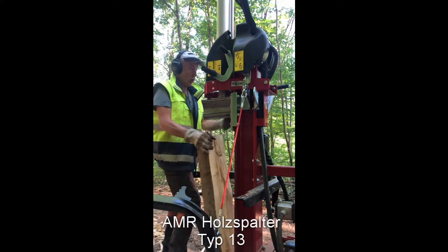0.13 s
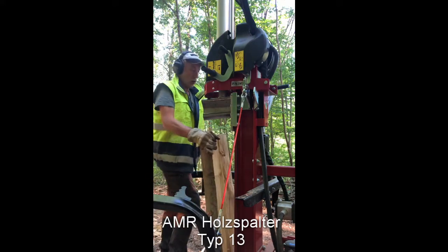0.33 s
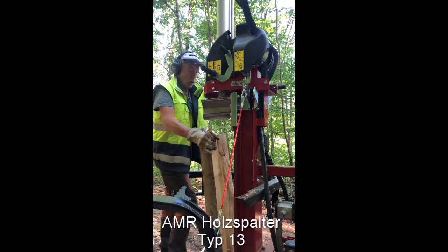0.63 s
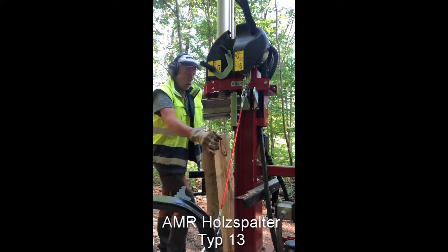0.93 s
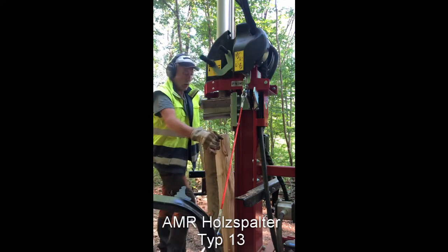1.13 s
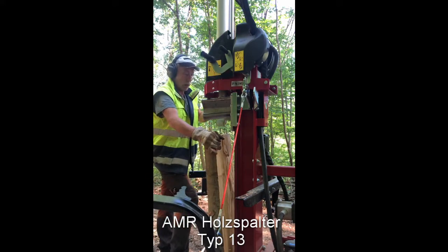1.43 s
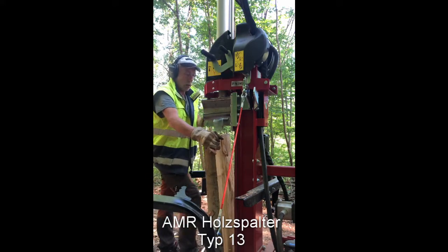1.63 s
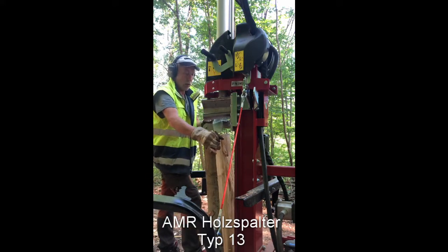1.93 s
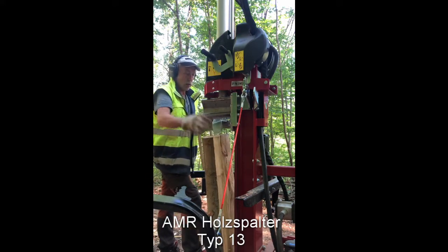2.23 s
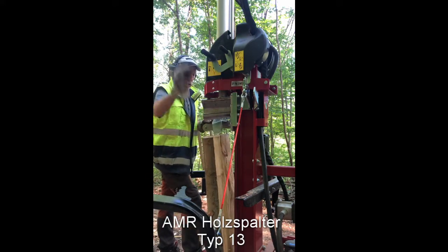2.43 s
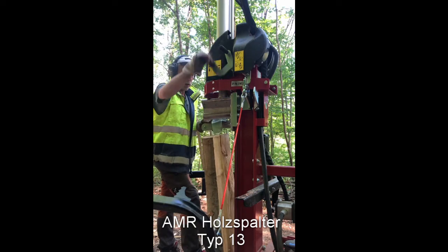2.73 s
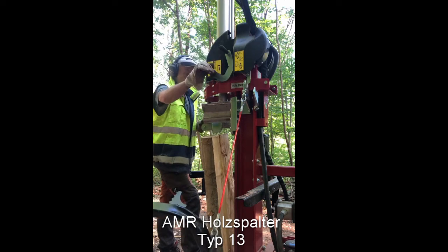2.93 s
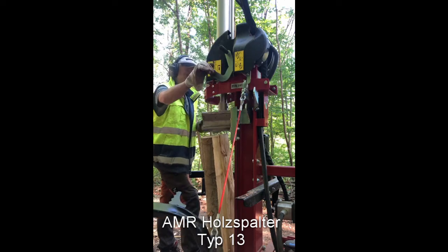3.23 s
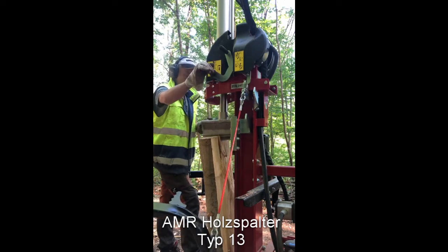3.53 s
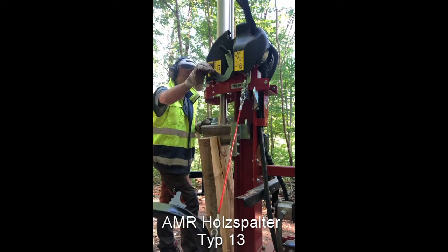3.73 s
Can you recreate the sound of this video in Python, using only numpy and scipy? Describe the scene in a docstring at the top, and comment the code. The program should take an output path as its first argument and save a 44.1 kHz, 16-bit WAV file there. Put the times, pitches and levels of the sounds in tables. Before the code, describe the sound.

A tractor diesel idles, driving a hydraulic log splitter that whines, squeals, then cracks wood apart.

```python
"""In a forest, close and dry: a three-cylinder tractor diesel idles and drives a hydraulic log splitter.
The engine sums tones locked to its cycle, gear whine, exhaust rumble and clatter noise swelling at each firing.
The lever clicks as damped noise, the loaded pump whines and groans, and sagging sines make the ram squeal.
Then the wedge tears the log open: pitched noise bursts crack over a grain of small tears, and the sound dips.
One microphone hears it all, on the left channel only; the right is silent."""
import sys
import numpy as np
from scipy import signal
from scipy.fft import rfft, irfft
from scipy.io import wavfile

SR = 44100
rng = np.random.default_rng(int(sys.argv[2]) if len(sys.argv) > 2 else 0)


def master_out(mix):
    """Clip the mix to full scale and print it as 16-bit PCM to the path in sys.argv[1]."""
    frames = np.transpose(np.atleast_2d(mix))
    ceiling = np.clip(frames, -1, 1)
    pcm = np.round(ceiling * 32767).astype(np.int16)
    wavfile.write(sys.argv[1], SR, pcm)


N = 170667

# Engine speed, sagging under load. Each row: time in seconds, four-stroke cycles per second.
ENGINE_SPEED = [(0, 11.508), (2.8, 11.508), (2.95, 11.42), (3.15, 11.19), (3.4, 11.0), (3.65, 10.66),
                (3.87, 10.4)]
START_CYCLES = 0.95  # share of the cycle already run at the start

# Exhaust and block tones. Each row: multiple of the cycle rate, level in dB relative to TONES_DB.
ENGINE_TONES = [(1, -47), (2, -48), (3, -18), (4, -38), (5, -28), (6, 0), (7, -25), (8, -26), (9, -7),
                (10, -23), (11, -23), (12, -9), (13, -11), (14, -19), (15, -13), (16, -18), (17, -26),
                (18, -15), (19, -26), (20, -17), (21, -19), (22, -12), (23, -14), (24, -13), (25, -17),
                (26, -23), (27, -28), (28, -26), (29, -17), (30, -13), (31, -19), (32, -28), (33, -21),
                (34, -21), (35, -17), (36, -26), (37, -24), (38, -27), (39, -20), (40, -27), (41, -20),
                (42, -20), (43, -16), (44, -15), (45, -20), (46, -28), (47, -19), (48, -17), (49, -23),
                (50, -20)]
TONES_DB = -23
# Every third multiple is a firing tone: radians at the start, radians lost per multiple.
FIRING_LEAD, FIRING_LAG = 0.6, 0.156
# One cylinder fires harder: place in the cycle, radians; other multiples below STRONG_TOP are tied to it.
STRONG_AT, STRONG_LEAD, STRONG_TOP = 0.586, -1.54, 27

# Uneven exhaust flow. Each row: frequency in Hz, relative density in dB per Hz.
EXHAUST_SPECTRUM = [(18, -36), (30, -18), (75, -9), (205, -6), (264, -2.5), (647, -7.5), (700, -52),
                    (910, -47), (1540, -120)]
EXHAUST_DB = -30

# Meshing gears. Each row: multiple of the cycle rate, rms level in dB before the gear gain.
GEAR_TONES = [(59, -43), (62, -45), (65, -44), (80, -43), (83, -41), (86, -43), (101, -44), (105, -45),
              (108, -44), (111, -30), (118, -40), (125, -41), (138, -44), (283, -50), (417, -55)]
GEAR_GAIN_DB, GEAR_WOBBLE_DB, GEAR_LOAD_LOSS_DB = 1.6, 0.8, 7  # the loss is at full load
# Faint whines of alternator and injection pump, moving with the engine.
# Each row: frequency at idle in Hz, nearly (taken to a whole multiple), rms level in dB before both gains.
IDLE_WHINES = [(1911, -53), (2175, -56), (2412, -53), (3085, -57), (3235, -56), (3451, -60), (4005, -62),
               (4253, -60), (4420, -57), (4818, -57), (5927, -62), (6837, -64), (8856, -67), (12640, -69)]
WHINE_GAIN_DB = 2

# Valve train and injectors. Each row: frequency in Hz, relative density in dB per Hz.
CLATTER_SPECTRUM = [(300, -31), (500, -7.5), (595, -4), (645, -15), (700, -4), (1200, -5), (1450, -3),
                    (1800, -9), (2100, -9), (2800, -15), (4000, -17), (6500, -20), (10000, -24.5),
                    (16000, -31)]
CLATTER_DB = -25.5  # before block resonances and swell
# Share alike in every cycle, fading above the cut in Hz; uneven taps within the cycle in dB.
REPEATING, REPEAT_CUT_HZ, TAP_SPREAD_DB = 0.72, 1300, 2
# Swell at each firing: height in dB, place of the first in cycles, sharpness as a power.
KNOCK_DB, KNOCK_AT, KNOCK_SHARP = 2.5, 0.28, 2
# Resonances of block and covers. Each row: frequency in Hz, width in Hz, gain in dB over the clatter.
BLOCK_RESONANCES = [(2420, 43, -7), (3250, 136, 0.5), (5140, 89, -10), (6500, 820, -13), (13100, 230, -3)]
# The machine as a whole grows quieter. Each row: time in seconds, gain in dB.
MACHINE_SINK = [(3.7, -0.5), (3.8, -2), (3.87, -2.5)]

# Oil pressure. Each row: time in seconds, pressure from 0 to 1.
OIL_PRESSURE = [(2.70, 0), (2.82, .5), (3.0, 0.66), (3.15, 0.57), (3.38, 0.95), (3.6, 0.73), (3.87, 0.63)]
# Pump teeth. Each row: multiple of the cycle rate, rms level in dB at full pressure before PUMP_GAIN_DB.
PUMP_TONES = [(24, -40), (128, -38), (170, -45)]
PUMP_GAIN_DB = -2
# The pump groans in spells. Each row: time in seconds, middle rms level in dB.
PUMP_GROAN = [(2.8, -62), (2.87, -35), (3.04, -34.5), (3.1, -51), (3.15, -48), (3.18, -28), (3.37, -26.5),
              (3.5, -49), (3.59, -28), (3.67, -34), (3.72, -32)]
GROAN_ORDER = 49  # multiple of the cycle rate
# Oil rushing through the valve. Each row: frequency in Hz, relative density in dB per Hz.
FLOW_SPECTRUM = [(120, -36), (200, 2), (231, -6), (503, -12.5), (540, -4), (683, -14.5), (1460, -7.5),
                 (1810, -16), (3940, -18), (15000, -34.5)]
FLOW_DB = -21  # middle rms at full pressure
HISS_HZ, HISS_WIDTH_HZ, HISS_DB = 6560, 3400, -31.5  # jet of oil at the valve edge, at full pressure
# The ram on its guide. Each row: start in seconds, length in seconds, starting pitch in Hz,
# rms level in dB before gain, flutter and fades.
RAM_SQUEALS = [(2.83, .25, 2840, -38), (2.83, .22, 3230, -39), (2.84, .22, 2400, -40),
               (2.95, .12, 5190, -41), (2.94, .54, 3950, -35), (3.27, .2, 3100, -40),
               (2.83, .12, 4850, -45), (3.04, .36, 4360, -42), (3.0, .36, 6660, -45), (3.0, .3, 7010, -48),
               (3.37, .08, 1910, -33), (2.93, .03, 14500, -50)]
SQUEAL_GAIN_DB, SQUEAL_FLUTTER_DB, SQUEAL_EDGE_S = 0.5, 3, 0.04
SQUEAL_SAG, SQUEAL_JITTER = 0.05, 0.005  # share of pitch lost per second, share of pitch it wanders

# Fibres snap. Each row: start in seconds, peak level in dB before CRACK_GAIN_DB, pitch in Hz.
FIBRE_CRACKS = [(3.412, -17, 3830), (3.4396, -3, 4500), (3.452, -17, 3000), (3.4614, -9, 8500),
                (3.4694, -6, 6560), (3.469, -12, 3300), (3.4803, -7, 4300), (3.4824, -9, 7000),
                (3.498, -11, 8500), (3.5004, -11, 5600), (3.512, -10, 8000), (3.524, -19, 5160),
                (3.5314, -6, 6960), (3.5414, -9, 4080), (3.545, -7.5, 8000), (3.5504, -4.5, 9100),
                (3.5565, -11, 4200), (3.5634, -9, 7870), (3.5797, -6, 5140), (3.6017, -13, 9500),
                (3.6228, -5, 7300), (3.6696, -6.5, 9240), (3.6955, -16, 6560), (3.7084, -13, 2930),
                (3.725, -6, 5960), (3.7489, -12, 2600), (3.7928, -15, 5270), (3.8077, -6.5, 4030),
                (3.8117, -15, 4500), (3.827, -23, 5040), (3.8487, -11, 2300), (3.849, -23, 6960),
                (3.8654, -13, 6950)]
CRACK_GAIN_DB, CRACK_T60_S, CRACK_Q = 2.5, 0.013, 4.0
BROAD_DB = -1  # wood-coloured noise beside the pitched part
# Dense tearing between the snaps. Each row: time in seconds, rms level in dB before flicker.
TEARING_LEVEL = [(3.39, -60), (3.41, -32), (3.435, -29), (3.46, -21), (3.52, -21), (3.56, -27), (3.6, -24),
                 (3.65, -29), (3.72, -25), (3.76, -29.5), (3.79, -27), (3.81, -24), (3.87, -24)]
TEARS_PER_S, TEAR_SPREAD_DB, TEAR_FLICKER_DB = 3000, 2.5, 3.5
# Colour of torn wood. Each row: frequency in Hz, relative density in dB per Hz.
WOOD_SPECTRUM = [(350, -13), (600, -6.5), (1230, -10.5), (1780, -29), (2210, -10), (2440, -17.5),
                 (3040, -10.5), (6640, -13.5), (16000, -17.5)]

# Short rubs and clicks of hand and lever. Each row: start in seconds, length in seconds before the decay,
# centre in Hz, rms level in dB before the envelope.
HAND_RUBS = [(1.679, 0.021, 7900, -29), (1.68, 0.031, 4200, -32), (2.73, 0.026, 5970, -35),
             (2.806, 0.0074, 3240, -23), (2.808, 0.01, 9500, -27.5)]
# Dull knocks of lever and wedge. Each row: start in seconds, peak level in dB, pitch in Hz.
DULL_THUDS = [(2.757, -11.5, 273), (2.785, -13, 267), (2.81, -12, 570), (2.943, -14, 470),
              (3.013, -11, 590), (3.375, -8.5, 595), (3.388, -16.5, 620), (3.399, -11, 475),
              (3.469, -10, 643), (3.502, -11, 620), (3.555, -8, 640), (3.6, -19, 910), (3.66, -19, 1050),
              (3.75, -16, 972), (3.807, -12, 1040)]
THUD_T60_S = 0.098
THUD_UPPER, THUD_UPPER_DB = 1.74, -5  # a second, broader ring: pitch ratio, relative level

# Bass, slightly lifted, drops out in three spells during the splitting.
# Each row: time in seconds, gain in dB.
BASS_GAIN = [(3.43, 1), (3.48, -1.5), (3.575, -6), (3.595, 1.5), (3.722, 1.5), (3.735, -14), (3.77, 0.5),
             (3.8, -7.5), (3.87, 1.5)]
BASS_HZ = 447
# The whole level dips briefly after some snaps.
# Each row: start in seconds, depth in dB before recovery eats into it, recovery spread in seconds.
LEVEL_DIPS = [(3.533, 8.5, 0.0055), (3.565, 7, .006), (3.674, 7, 0.0039), (3.7, 5, 0.0049),
              (3.731, 8.5, 0.0064), (3.794, 11, 0.0077), (3.83, 19, 0.0081), (3.854, 7, 0.0069)]
DIP_FALL_S = 0.0022
CUTOFF_HZ = 15760


def engine(turns, load):
    """Idling diesel: cycle-locked tones, rough exhaust flow, gear whine and clatter."""
    exhaust = amp(EXHAUST_DB) * coloured(rng.standard_normal(N), EXHAUST_SPECTRUM)
    return firing(turns) + exhaust + gears(turns, load) + clatter(turns)


def firing(turns):
    """Combustion repeats each cycle; phases align the firing tones and mark one stronger cylinder."""
    k = np.round(np.transpose(ENGINE_TONES)[0])
    free = rng.uniform(0, 2 * np.pi, len(k))
    phases = np.where(k < STRONG_TOP, STRONG_LEAD - 2 * np.pi * STRONG_AT * k, free)
    phases = np.where(k % 3 == 0, FIRING_LEAD - FIRING_LAG * k, phases)
    return amp(TONES_DB) * tones(ENGINE_TONES, phases, turns)


def clatter(turns):
    """Valve and injector noise partly repeats each cycle, swells at each firing and rings the block."""
    taps = amp(TAP_SPREAD_DB * np.repeat(rng.standard_normal(48), 80))
    pattern = rfft(rms_one(taps * rng.standard_normal(3840)))
    # Clear the multiples already sounding, then those left quiet beside the main whine.
    pattern[[m for m, _ in GEAR_TONES] + list(range(len(ENGINE_TONES) + 1))] = 0
    pattern[[109, 110, 113, 114, 115, 116, 117]] = 0
    same = looped(irfft(pattern), turns)
    fresh = rng.standard_normal(N) * np.sqrt(looped(rms_one(taps), turns))
    low = signal.butter(2, REPEAT_CUT_HZ, fs=SR, output="sos")
    mix = fresh + REPEATING * (signal.sosfilt(low, same) - signal.sosfilt(low, fresh))
    noise = coloured(mix, CLATTER_SPECTRUM)
    ringing = sum(amp(db) * resonate(noise, hz, width_hz) for hz, width_hz, db in BLOCK_RESONANCES)
    knock = (0.5 + 0.5 * np.cos(2 * np.pi * 3 * (turns - KNOCK_AT))) ** KNOCK_SHARP
    return amp(CLATTER_DB + KNOCK_DB * knock + 0.5 * drift(10)) * (noise + ringing)


def gears(turns, load):
    """Meshing teeth and auxiliaries whine on cycle multiples, quieter under load."""
    whines = [(hz / ENGINE_SPEED[0][1], db) for hz, db in IDLE_WHINES]
    out = tones(GEAR_TONES, rng.uniform(0, 2 * np.pi, len(GEAR_TONES)), turns)
    out += amp(WHINE_GAIN_DB) * tones(whines, np.arange(len(whines)) ** 2, turns)
    return out * amp(GEAR_GAIN_DB + GEAR_WOBBLE_DB * drift(14) - GEAR_LOAD_LOSS_DB * load)


def hydraulics(turns, load):
    """Pump whine and turbulent oil noise grow with pressure, beside the groan and the squealing ram."""
    whine = load * tones(PUMP_TONES, np.zeros(len(PUMP_TONES)), turns)
    whine *= amp(PUMP_GAIN_DB + 1.5 * drift(17))
    groan = amp(in_time(PUMP_GROAN) + 1.1 * drift(12)) * tones([(GROAN_ORDER, 0)], [0], turns)
    flow = load * amp(FLOW_DB + 3.2 * drift(9.9)) * coloured(rng.standard_normal(N), FLOW_SPECTRUM)
    jet = resonate_twice(rng.standard_normal(N), HISS_HZ, HISS_WIDTH_HZ)
    hiss = load * amp(HISS_DB + 1.1 * drift(14)) * rms_one(jet)
    return whine + groan + flow + hiss + ram_squeals()


def ram_squeals():
    """Metal rubbing on its guide sings in wavering, sagging sines."""
    out = np.zeros(N)
    for s, length, hz, db in RAM_SQUEALS:
        t = np.arange(int(length * SR)) / SR
        pitch = hz * (1 - SQUEAL_SAG * t + SQUEAL_JITTER * drift(61)[:len(t)])
        level = amp(db + SQUEAL_GAIN_DB + SQUEAL_FLUTTER_DB * drift(24)[:len(t)])
        fade = np.minimum(np.minimum(t, length - t) / SQUEAL_EDGE_S, 1)
        add(out, s, np.sqrt(2) * level * np.sin(2 * np.pi * np.cumsum(pitch) / SR) * fade)
    return out


def splitting():
    """Each fibre snap is a dying burst with its own pitch, over a dense grain of small tears."""
    sizes = amp(TEAR_SPREAD_DB * np.minimum(rng.exponential(1, N), 5))
    tears = sizes * rng.choice([-1, 1], N) * (rng.random(N) < TEARS_PER_S / SR)
    level = amp(in_time(TEARING_LEVEL) + TEAR_FLICKER_DB * drift(71))
    out = level * (in_time(OIL_PRESSURE) > 0) * coloured(tears, WOOD_SPECTRUM)
    t = np.arange(SR // 20) / SR
    envelope = amp(-60 * t / CRACK_T60_S) * np.minimum(t / 0.00071, 1)
    for s, db, hz in FIBRE_CRACKS:
        noise = rng.standard_normal(2 * len(t))
        burst = rms_one(resonate_twice(noise, hz, hz / CRACK_Q))
        burst += amp(BROAD_DB) * coloured(noise[::-1], WOOD_SPECTRUM)
        settled = burst[len(t):]  # skip the resonator's build-up
        add(out, s, amp(db + CRACK_GAIN_DB) * peak_one(envelope * settled))
    return out


def handling():
    """Rubs are short bursts of broad noise; thuds are damped noise in two resonances."""
    out, t = np.zeros(N), np.arange(SR // 5) / SR
    for s, length, hz, db in HAND_RUBS:
        burst = rms_one(resonate(rng.standard_normal(len(t)), hz, hz * 0.27))
        envelope = np.minimum(t / 0.0018, 1) * np.exp(-np.maximum(t - length, 0) / 0.0042)
        add(out, s, amp(db) * burst * envelope)
    envelope = amp(-60 * t / THUD_T60_S) * np.minimum(t / 0.0033, 1)
    for s, db, hz in DULL_THUDS:
        body = rms_one(resonate_twice(rng.standard_normal(len(t)), hz, hz * 0.45))
        upper = rms_one(resonate_twice(rng.standard_normal(len(t)), hz * THUD_UPPER, hz))
        add(out, s, amp(db) * peak_one(envelope * (body + amp(THUD_UPPER_DB) * upper)))
    return out


def tones(rows, phases, turns):
    """Sines on whole multiples of the cycle rate, from (multiple, rms dB) rows."""
    at = np.arange(8192) / 8192
    cycle = np.zeros(len(at))
    for (k, db), phase in zip(rows, phases):
        cycle += np.sqrt(2) * amp(db) * np.cos(2 * np.pi * round(k) * at + phase)
    return looped(cycle, turns)


def looped(cycle, turns):
    """Play one stored cycle at the engine's speed."""
    return np.interp(turns % 1 * len(cycle), np.arange(len(cycle) + 1), np.append(cycle, cycle[0]))


def coloured(x, points):
    """Shape x with a gain curve of (Hz, dB) points; rms 1."""
    hz, db = np.transpose(points)
    f = np.fft.rfftfreq(len(x), 1 / SR) + 1
    gain = amp(np.interp(np.log(f), np.log(hz), db, left=-90, right=-90))
    return rms_one(irfft(rfft(x) * gain, len(x)))


def resonate(x, hz, width_hz):
    """One resonance, gain about 1 on top."""
    r = np.exp(-np.pi * width_hz / SR)
    poles = [1, -2 * r * np.cos(2 * np.pi * hz / SR), r * r]
    return signal.lfilter([(1 - r * r) / 2, 0, (r * r - 1) / 2], poles, x)


def resonate_twice(x, hz, width_hz):
    """The same resonance twice in a row, for steeper skirts."""
    return resonate(resonate(x, hz, width_hz), hz, width_hz)


def drift(rate_hz):
    """Slow random wander, spread 1, made at a fortieth of the sample rate."""
    r = np.exp(-80 * np.pi * rate_hz / SR)
    noise = rng.standard_normal(N // 40 + 2002)
    slow = signal.lfilter([1], [1, -2 * r, r * r], noise)[2000:]  # skip the build-up
    return np.interp(np.arange(N) / 40, np.arange(len(slow)), rms_one(slow))


def in_time(rows):
    """A curve through (seconds, value) rows, sample by sample."""
    s, v = np.transpose(rows)
    return np.interp(np.arange(N) / SR, s, v)


def add(out, s, piece):
    """Mix a piece in at s seconds."""
    i = int(s * SR)
    out[i:i + len(piece)] += piece[:len(out) - i]


def amp(db):
    """Decibels to gain."""
    return 10 ** (np.asarray(db) / 20)


def rms_one(x):
    """Scale to rms 1."""
    return x / np.sqrt(np.mean(x ** 2) + 1e-20)


def peak_one(x):
    """Scale to peak 1."""
    return x / np.abs(x).max()


def scene():
    """Everything reaches one microphone, on the left channel."""
    turns = START_CYCLES + np.cumsum(in_time(ENGINE_SPEED)) / SR
    load = in_time(OIL_PRESSURE)
    machine = (engine(turns, load) + hydraulics(turns, load)) * amp(in_time(MACHINE_SINK))
    return (machine + splitting() + handling()) * [[1], [0]]


def record(dry):
    """Bass and level dip during the splitting, peaks are rounded, the top is cut."""
    t = np.arange(N) / SR
    low = signal.sosfiltfilt(signal.butter(2, BASS_HZ, fs=SR, output="sos"), dry)
    dip_db = np.zeros(N)
    for s, depth_db, back_s in LEVEL_DIPS:
        since = np.maximum(t - s, 0)
        dip_db += depth_db * np.minimum(since / DIP_FALL_S, 1) * np.exp(-(since / back_s) ** 2 / 2)
    dipped = (dry + low * (amp(in_time(BASS_GAIN)) - 1)) * amp(-dip_db)
    rounded = 0.95 * np.tanh(dipped / 0.95)
    return signal.sosfilt(signal.ellip(14, 0.1, 75, CUTOFF_HZ, fs=SR, output="sos"), rounded)


dry = scene()
out = record(dry)
master_out(out)
```